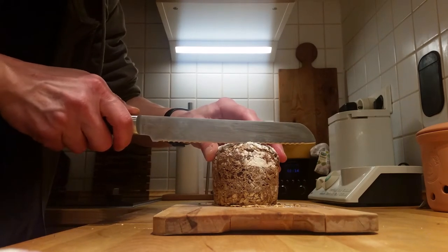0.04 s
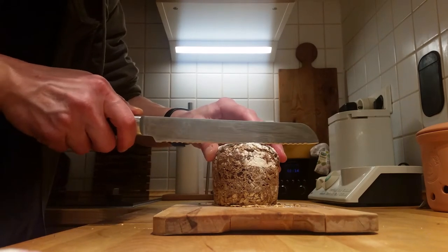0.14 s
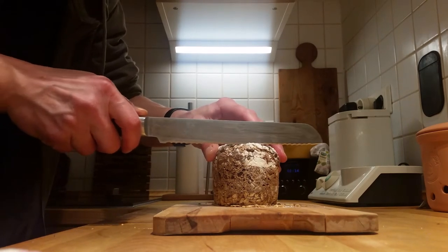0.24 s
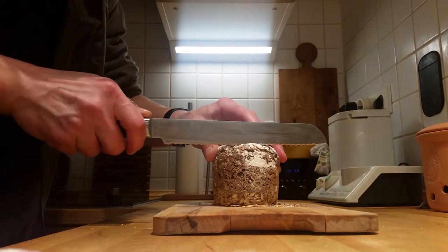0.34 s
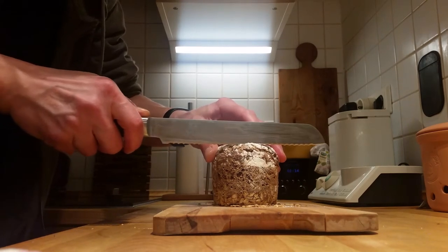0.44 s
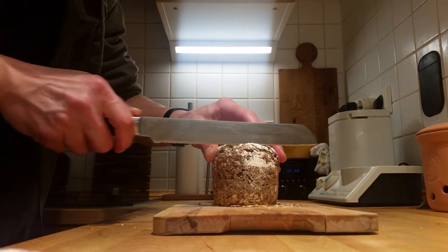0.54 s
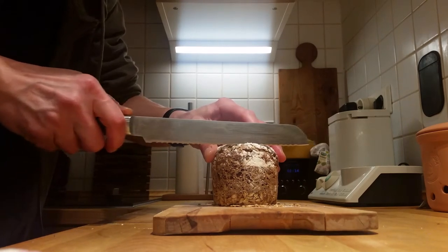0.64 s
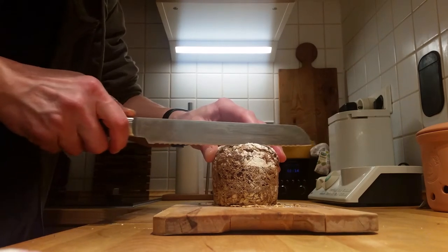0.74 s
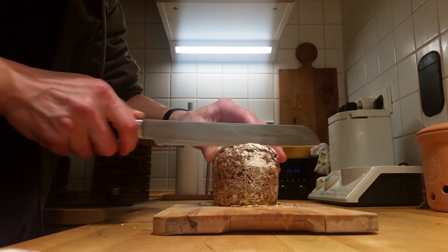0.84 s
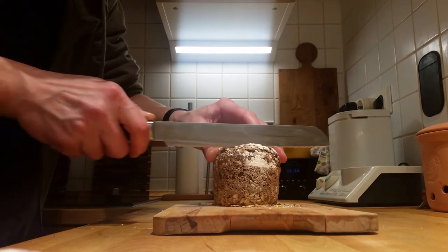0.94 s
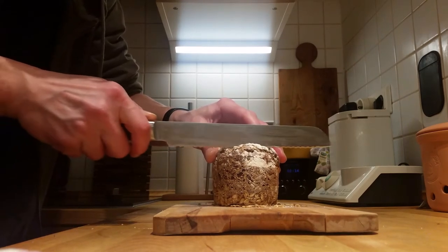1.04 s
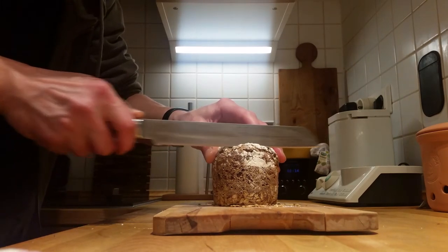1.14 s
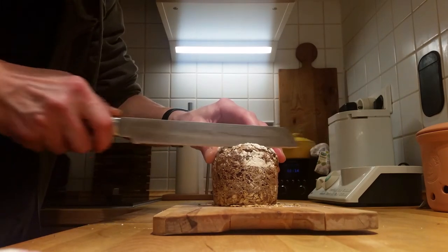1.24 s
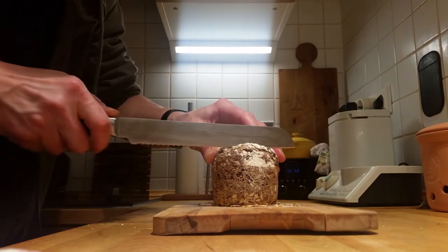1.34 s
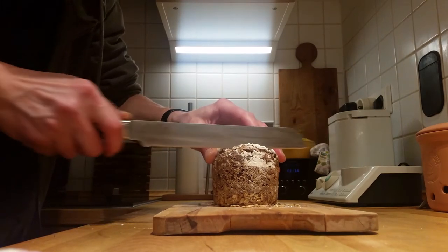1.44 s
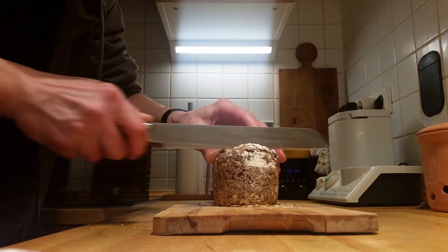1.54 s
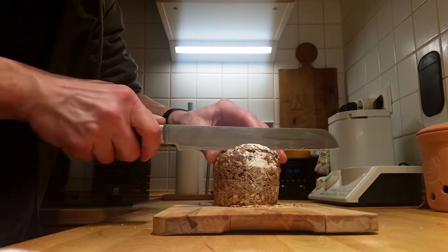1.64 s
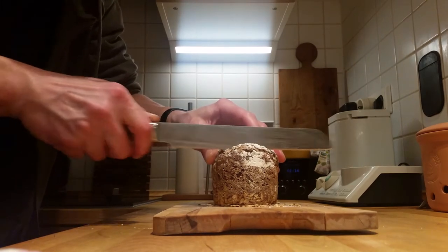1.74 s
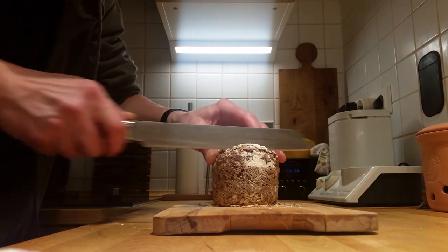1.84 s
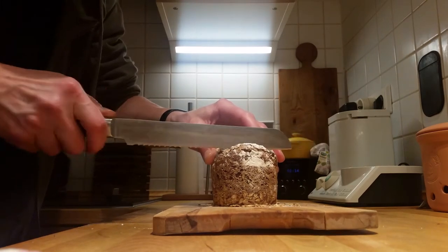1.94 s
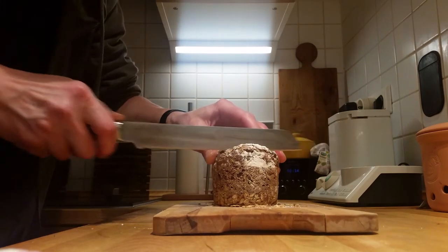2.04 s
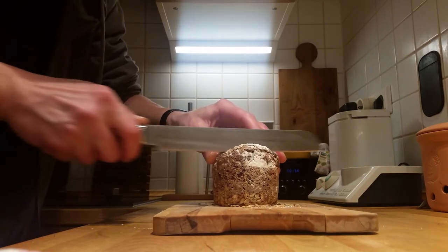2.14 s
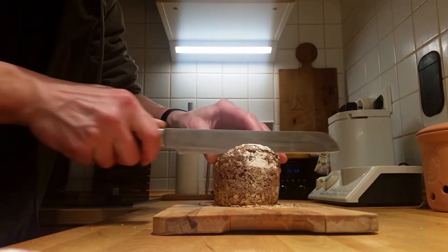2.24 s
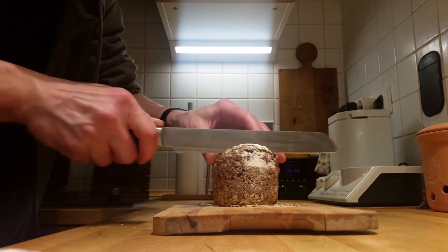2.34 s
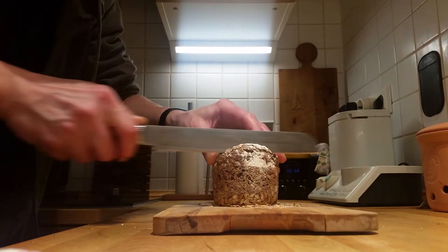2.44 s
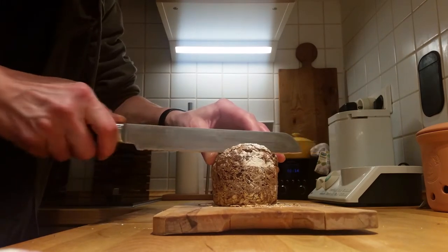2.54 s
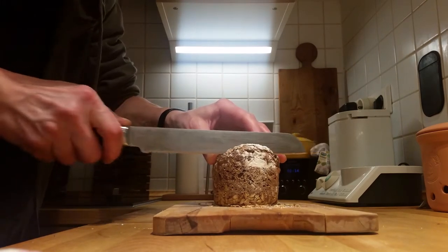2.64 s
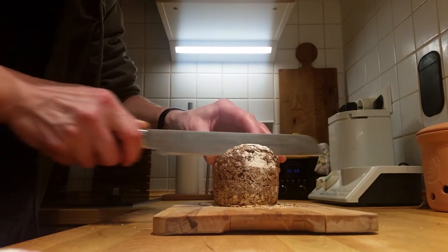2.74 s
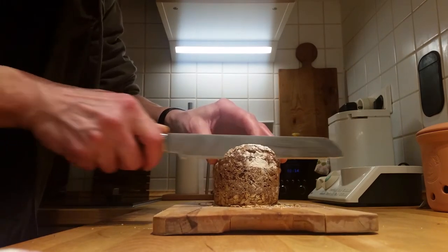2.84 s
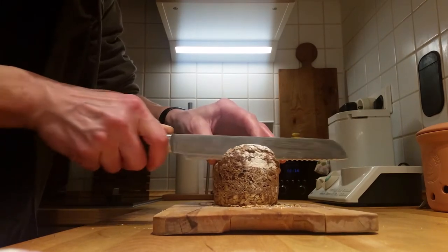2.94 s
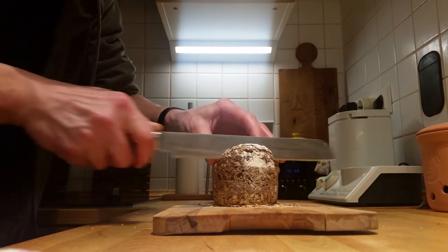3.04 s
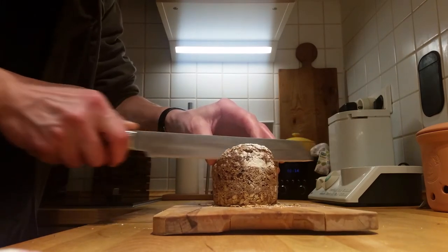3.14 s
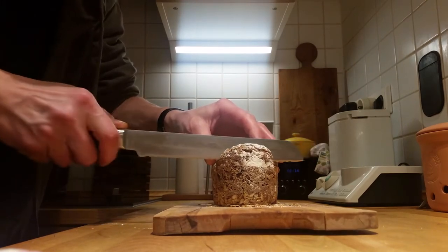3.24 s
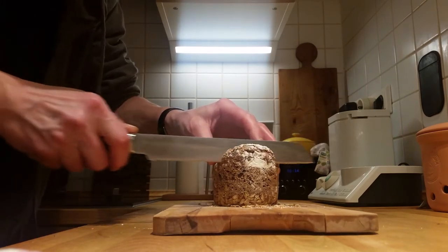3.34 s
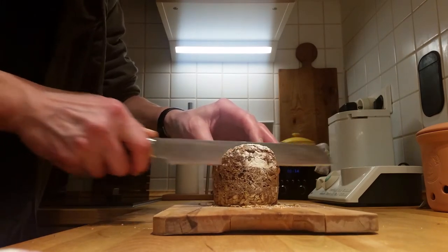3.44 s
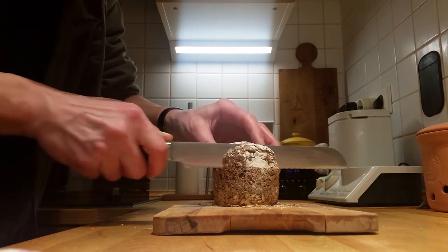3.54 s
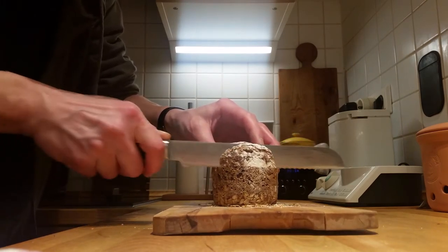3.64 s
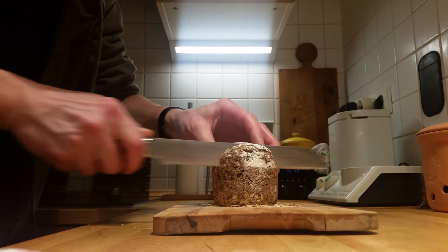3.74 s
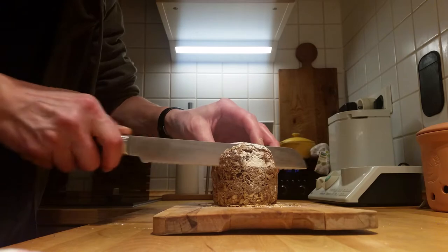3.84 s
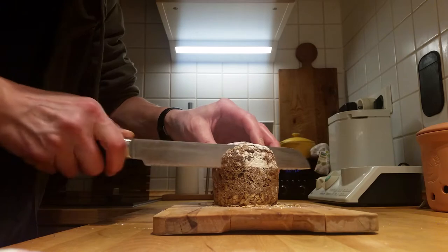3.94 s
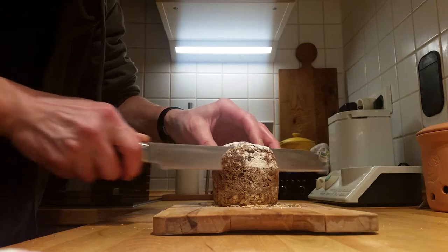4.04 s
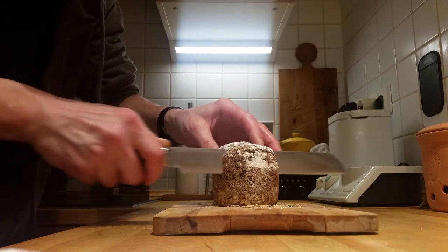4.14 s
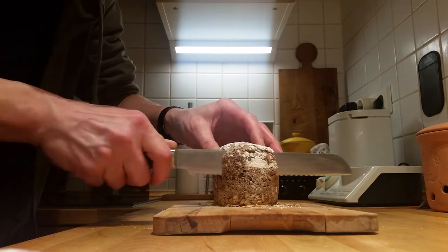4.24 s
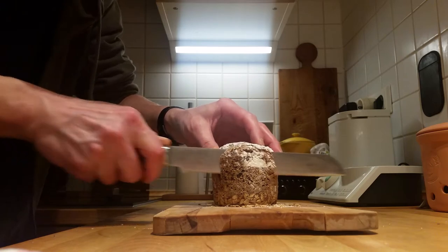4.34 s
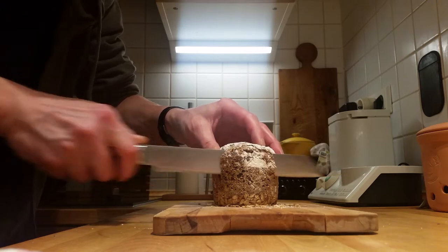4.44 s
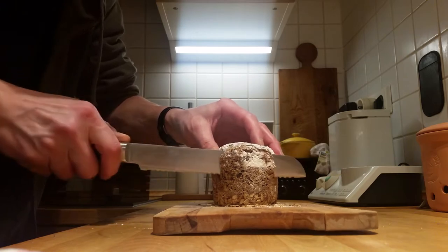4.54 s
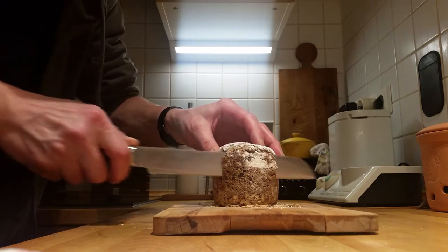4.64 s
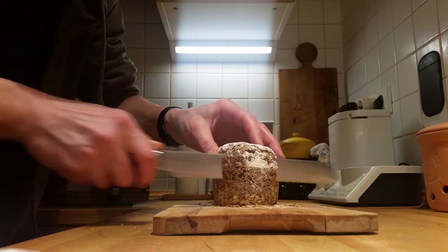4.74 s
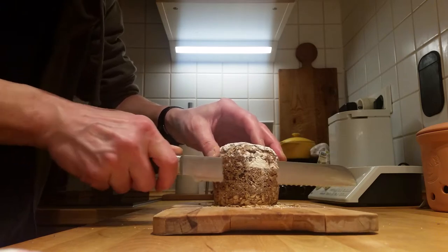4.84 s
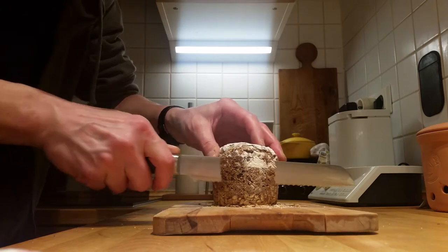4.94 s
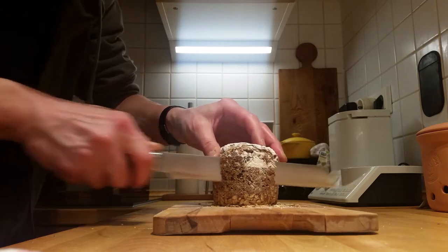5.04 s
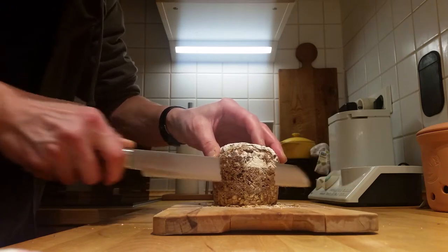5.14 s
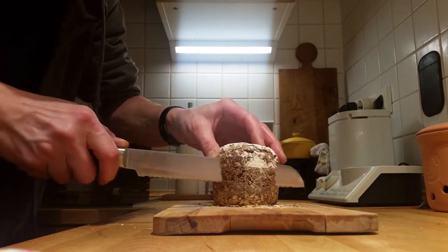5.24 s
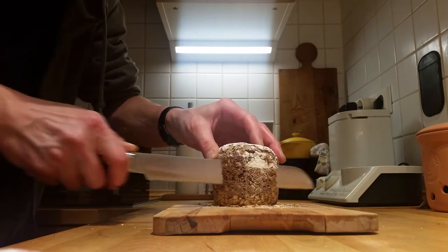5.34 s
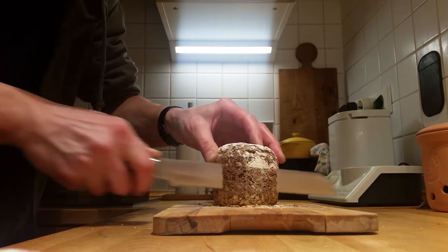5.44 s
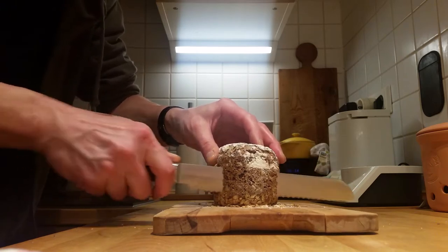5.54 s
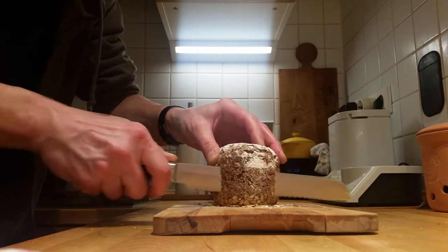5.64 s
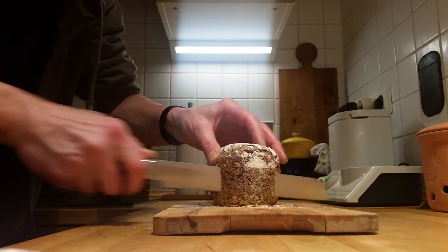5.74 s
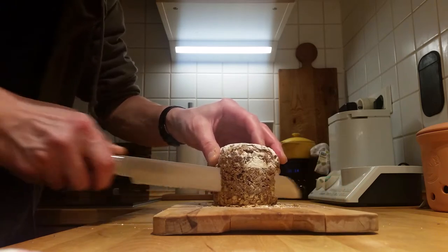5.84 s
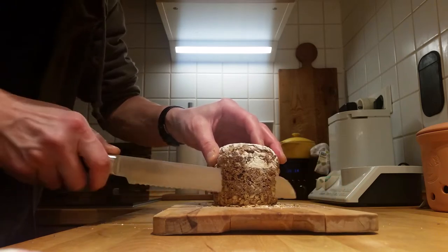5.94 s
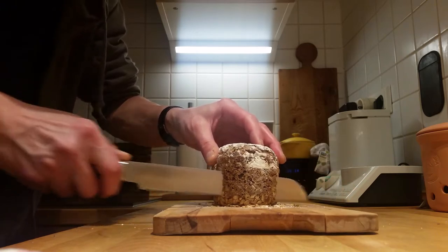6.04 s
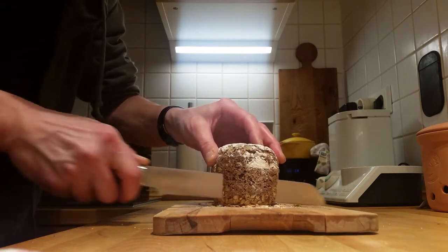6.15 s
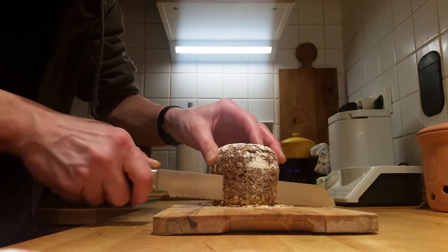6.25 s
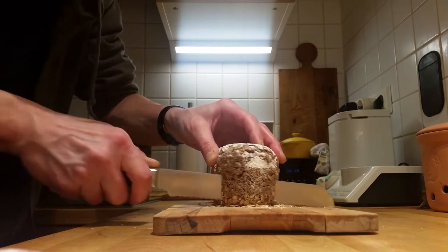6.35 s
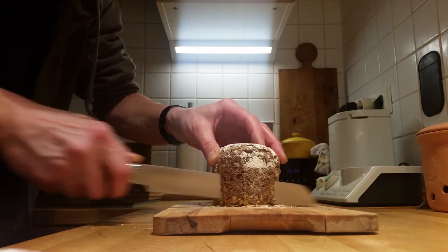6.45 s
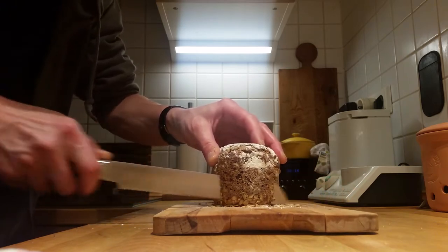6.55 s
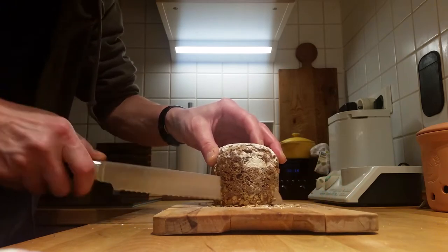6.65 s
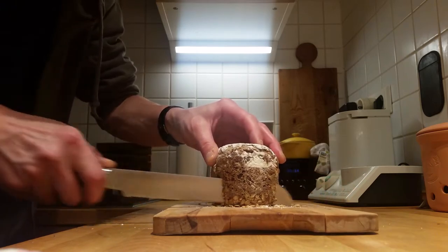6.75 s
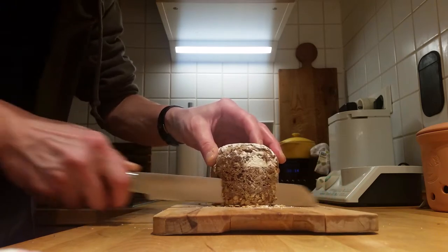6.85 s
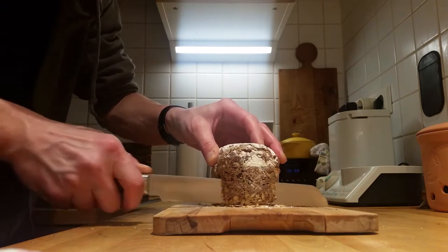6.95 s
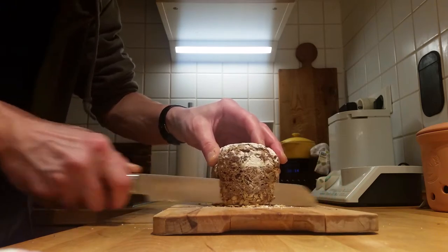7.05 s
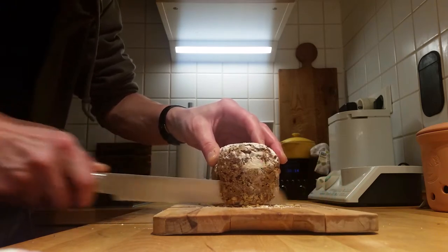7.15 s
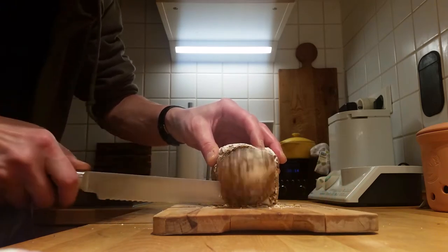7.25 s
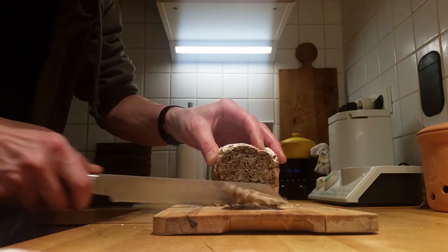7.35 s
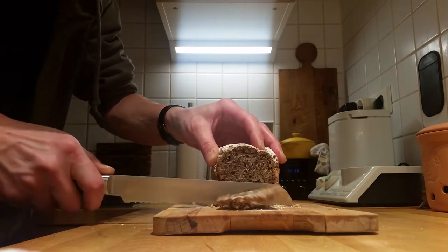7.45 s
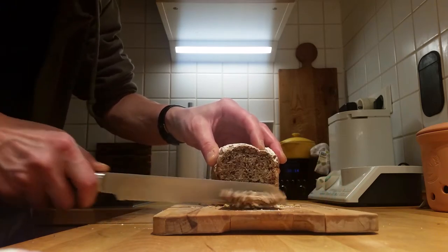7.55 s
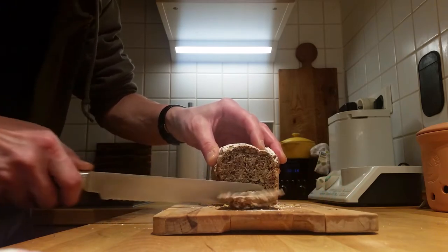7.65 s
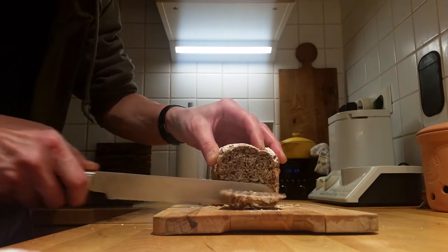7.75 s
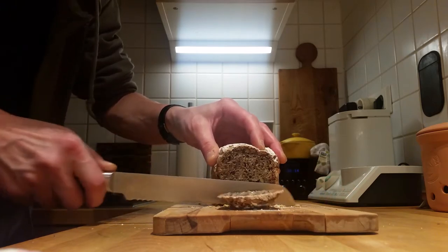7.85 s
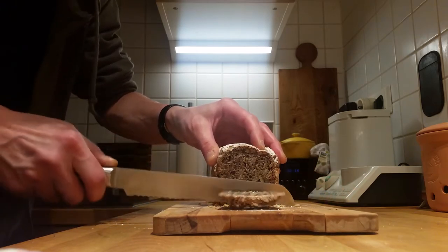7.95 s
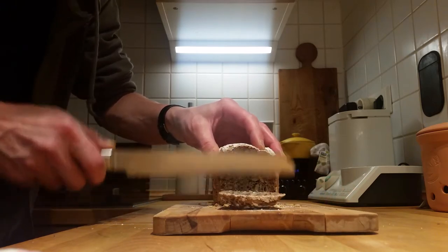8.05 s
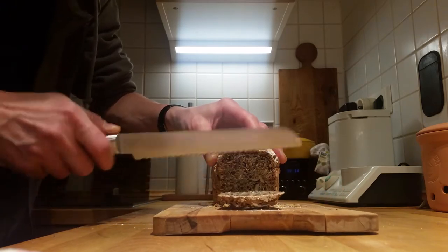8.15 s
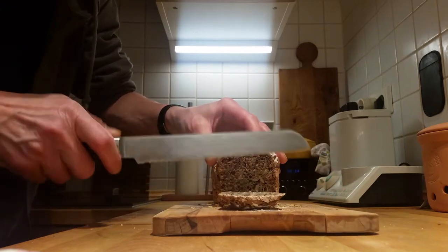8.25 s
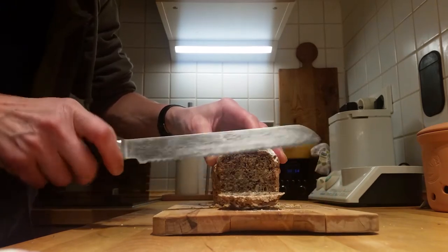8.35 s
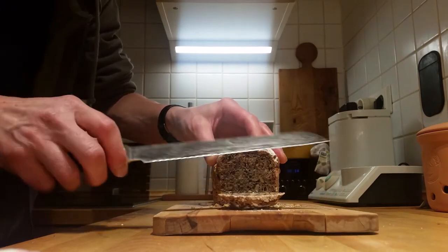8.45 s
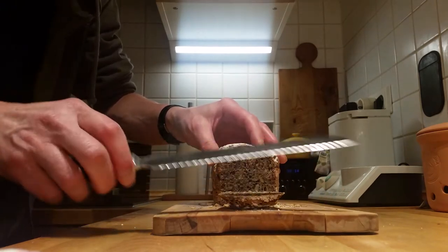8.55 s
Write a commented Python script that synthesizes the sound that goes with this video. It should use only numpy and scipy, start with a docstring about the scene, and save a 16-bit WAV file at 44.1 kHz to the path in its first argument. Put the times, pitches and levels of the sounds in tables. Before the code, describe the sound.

In a quiet tiled kitchen, a phone on the worktop picks up low room tone and faint hiss. From about 0.4 seconds a toothed knife makes light, muffled strokes on a dense loaf, with small board bumps. By 1.2 seconds the sawing is stronger: roughly three strokes per second, each swelling into a deep worktop hum and grainy crumb rasp. From 1.8 to 5.6 seconds crisp little crust cracks and dull wooden knocks scatter irregularly among the strokes. Around 6 seconds the cutting is somewhat smoother, with fewer cracks. From 6.8 the teeth scrape bare wood, brighter and harsher, strongest near 7.25. At 7.4 the slice lands with a loud, nearly merged double knock. Two shorter scrapes follow until about 7.9, then the knife lifts and is turned almost silently around 8.5. Echoes are short; the low hum leans left, the treble right.

```python
"""A knife with a toothed edge is set on a dense loaf on a wooden board and saws through it, stroke by stroke.
Each stroke shakes the worktop and board by filtered noise and a low hum; the crust cracks and the board knocks
in short filtered bursts. Near the end the teeth scrape bare wood, the slice drops with a double knock, and
the knife is lifted off and turned in the hand. All along, a phone on the worktop hears this with two
microphone ports, with the echo of a tiled kitchen, quiet room tone and faint microphone hiss."""
import sys
import numpy as np
from scipy import signal
from scipy.fft import rfft, irfft, next_fast_len
from scipy.io import wavfile
from scipy.ndimage import uniform_filter1d

SR = 44100
rng = np.random.default_rng(int(sys.argv[2]) if len(sys.argv) > 2 else 0)


def unload_wav(signal):
    """Save mono or channel-first audio to the path in sys.argv[1] as 16-bit WAV at rate SR, clipped to [-1, 1]."""
    wavfile.write(
        sys.argv[1],
        SR,
        np.round(np.clip(np.atleast_2d(signal).T, -1, 1) * 32767).astype(np.int16),
    )


N = 378991  # length in samples

# Knife strokes, from setting the knife on the loaf to lifting it off.
# Each row: fastest moment in seconds, rise time in seconds, fall time in seconds, then the peak levels in dB
# that drive worktop sway, worktop thrum, board, rasp of the teeth and crumb hiss.
STROKES = [(0.371, 0.28, 0.1, -65, -58, -68.5, -82, -95), (0.601, 0.11, 0.21, -56, -47, -59, -64, -71.5),
           (0.938, 0.14, 0.19, -51, -41, -59.5, -66, -76.5),
           (1.232, 0.078, 0.14, -40, -35.5, -59.5, -65, -66.5),
           (1.623, 0.32, 0.13, -46, -35, -50, -57, -67.5), (1.908, 0.12, 0.13, -28.5, -33, -52.5, -56, -64),
           (2.216, 0.16, 0.13, -37, -26.5, -42, -51, -61),
           (2.542, 0.15, 0.098, -33.5, -35, -52.5, -52, -63.5),
           (2.847, 0.24, 0.15, -41.5, -29.5, -46, -54, -63.5), (3.16, 0.083, 0.17, -32, -34, -47, -54, -63),
           (3.537, 0.19, 0.135, -45, -30.5, -47, -53, -65),
           (3.827, 0.12, 0.15, -36.5, -32.5, -46, -54, -64.5),
           (4.158, 0.2, 0.15, -40.5, -28.5, -41.5, -54.5, -69),
           (4.516, 0.18, 0.12, -43.5, -41, -54.5, -59, -71.5),
           (4.85, 0.18, 0.13, -33.5, -29, -41, -48.5, -60.5),
           (5.124, 0.11, 0.19, -36, -32, -41, -54, -62.5), (5.553, 0.2, 0.096, -43, -30, -38.5, -48, -61),
           (5.895, 0.21, 0.1, -51, -37, -48, -61, -74.5), (6.23, 0.3, 0.14, -59, -35, -47.5, -56.5, -76),
           (6.562, 0.15, 0.13, -60, -34.5, -46.5, -53, -72.5), (6.76, 0.062, 0.19, -52, -38, -51, -65, -88),
           (6.94, 0.11, 0.074, -54, -35, -38.5, -38, -59.5),
           (7.252, 0.15, 0.066, -64, -32.5, -34, -36, -56),
           (7.43, 0.094, 0.11, -47.5, -31.5, -36, -37.5, -60.5),
           (7.686, 0.13, 0.096, -62, -37, -41.5, -44.5, -74),
           (7.843, 0.052, 0.13, -65, -40, -42.5, -42, -65.5),
           (8.11, 0.35, 0.35, -77, -67.5, -69.5, -76, -97)]
# The knife is turned in the hand over the board. Each row: the same columns and units as the strokes.
HANDLING = [(8.52, 0.037, 0.06, -93, -72, -74, -71, -102)]
# Board rocking; the last two rows are the slice landing on its edge, then flat.
# Each row: start in seconds, base level in dB, share of the feet in dB, share of the bright rattle in dB.
KNOCKS = [(0.559, -47.5, 4.5, -21), (0.637, -47, -12, -3), (0.821, -46, 8.5, -21), (1.349, -39.5, 20.5, 3),
          (1.449, -42, 9, -6), (1.598, -45.5, -2, -16), (1.996, -37.5, 17, -4), (2.102, -35.5, 1.5, -6.5),
          (2.55, -48, -13, 12), (2.624, -38.5, 18.5, 0.5), (2.699, -30.5, -1, -14), (3.149, -48, -2, -6),
          (3.284, -51, 24.5, -14), (3.362, -39.5, 7, -24), (3.738, -40, 17.5, -4), (3.932, -38.5, 15, -7),
          (4.014, -33.5, -10, -10), (4.669, -35, -1, -12), (4.727, -48, -3, 2), (5.311, -47.5, -3, -15),
          (5.414, -38, -17.5, -4), (6.014, -39, -3, -14), (6.724, -40.5, -5, -19),
          (7.386, -15.5, -12, -2.5), (7.3888, -20.5, -7, -3)]
# Crust cracks and bites of the teeth.
# Each row: start in seconds, base treble level in dB, share into loaf and board in dB.
CRACKS = [(0.491, -48, 10), (1.1249, -37.5, 6.5), (1.7596, -35, 7), (2.403, -32.5, 6.5), (2.8527, -31, 0),
          (3.037, -32, 3.5), (3.077, -40, -2), (3.488, -37, 3), (3.6918, -31, 5), (4.084, -40, 9),
          (4.0995, -32.5, 5), (4.134, -35.5, -15), (4.2043, -35.5, -10), (4.2338, -35, -5),
          (4.287, -54, -16), (4.35, -36, 7.5), (4.6856, -58, 19), (4.7508, -48, 9), (4.7642, -33, 6.5),
          (4.8796, -33, -10), (4.91, -40.5, -4), (5.018, -37.5, 7.5), (5.0609, -39, -5), (5.222, -41, 13),
          (5.39, -49, 0), (5.5191, -34.5, 5), (5.5744, -35, 0), (5.9304, -34.5, 8), (6.63, -35, 7),
          (6.786, -62.5, 27), (7.385, -47.5, 12.5), (7.427, -38.5, 5), (8.0942, -57.5, 14)]
# Resonances of each thing that sounds.
# Each row: pitch in Hz, width in Hz (before any extra damping), relative level in dB.
WORKTOP_TONES = [(88.6, 25.4, -0.5), (110.4, 22.7, 2.5), (150, 22.7, -1), (197, 11, -14),
                 (194, 35.7, -14.5)]
BOARD_LOW_TONES = [(304.4, 17.6, 1), (363, 20.9, 2.5), (439.5, 60.3, -0.5), (620, 89, -13.5)]
BOARD_HIGH_TONES = [(740, 45, -3), (890, 45, -7), (1025, 40, 0), (1255, 70, -8), (1520, 60, -8),
                    (2100, 70, -13), (2360, 140, -8), (2870, 150, -24)]
BLADE_TONES = [(3670, 500, 2.5), (6250, 360, -2), (7500, 500, -14.5), (8900, 250, 1), (10200, 250, 7),
               (11700, 250, -4), (13600, 600, 3.5), (15150, 350, 4)]
FEET_TONES = [(166, 37, 3.5), (220.5, 36, -3), (297, 44, 0)]  # the board rocking on its feet
LOAF_TONES = [(695, 580, -5.5), (945, 202, 3), (1450, 590, -7), (2057, 380, -5), (3000, 450, -16.5)]
CRUST_TONES = [(4100, 890, 2), (6300, 300, -10.5), (8660, 590, -6), (10030, 400, 2), (11300, 1600, -0.5),
               (12600, 2200, 0), (15200, 1600, 3.5)]
# How the two microphone ports differ. Each row: pitch in Hz, left minus right in dB.
PORT_BALANCE = [(50, 6.5), (110, 10), (200, 3), (380, 0), (800, -2.5), (1300, -2), (2400, -11), (4400, -34),
                (6000, -21), (9000, -20), (15000, -9)]
# The hiss swells while the knife works. Each row: time in seconds, level in dB before the top is cut.
HISS_LEVEL = [(0, -73), (.42, -70), (.6, -65.5), (1.63, -60.5), (3.28, -60.5), (4.09, -59.5), (4.47, -62),
              (4.9, -60.5), (5.45, -60.5), (5.67, -63.5), (6.2, -61.5), (6.45, -65), (7.37, -59.5),
              (7.8, -59), (8.04, -64.5), (8.25, -72.5)]
# Tone color of the hiss in each port. Each row: pitch in Hz, relative level in dB per Hz.
HISS_LEFT = [(1500, -6), (3000, -20.5), (3500, -1), (4200, 4), (4800, -1), (5300, -33.5), (8000, -34),
             (12000, -25), (16000, -16)]
HISS_RIGHT = [(1500, -11.5), (3000, -54), (4200, -6), (5300, -38), (8000, -46.5), (16000, -65)]
# Tone color of the quiet room. Each row: pitch in Hz, relative level in dB per Hz.
KITCHEN_TONE = [(18, -45), (30, -23), (107, -4.5), (140, 2.5), (270, -10.5), (420, -9.5), (618, -20.5),
                (694, -17), (809, -18.5), (3000, -91), (3900, -76), (6600, -120)]

KITCHEN_DB = -67.5
SWAY_HZ = 52  # center of the wandering hum
BARE_WOOD_S, WOOD_FADE_S = 6.78, 0.061  # when the teeth reach the board, and how long the change takes
FADE_DB, ARCH = 16.5, 1.78  # drop one rise or fall time from the peak; roundness of the arch
SWAY_FADE_DB, SWAY_LATE_S = 18.5, 0.045  # the heavy worktop answers late
# Crumbs keep breaking after a crack: decay time, and levels relative to the crack.
CRUMBLE_S, CRUMBLE_TREBLE_DB, CRUMBLE_LOAF_DB = 0.041, -24.5, -20
LOAF_DAMP = 2.22  # times wider low board resonances while the blade sits in the crumb
PORT_LAG_S = 0.00016  # left hears later
ROOM_T60_S, ROOM_DB = 0.22, -9  # time for the noise tail to drop 60 dB; echo level before its bass is thinned
TOP_HZ = 15650  # nearly nothing is left above this


def sawing():
    """Teeth tearing crumb drive worktop, board, loaf and crust; later they scrape bare wood."""
    t = np.arange(N) / SR
    thrum, board, rasp, hiss = (stroke_level(column=k, fade_db=FADE_DB) for k in range(1, 5))
    crumbs = crumble()
    rasp = np.hypot(rasp, undb(CRUMBLE_LOAF_DB) * crumbs)
    hiss = np.hypot(hiss, undb(CRUMBLE_TREBLE_DB) * crumbs)
    wood = np.clip((t - BARE_WOOD_S) / WOOD_FADE_S, 0, 1)
    worktop = worktop_sway() + worktop_thrum(thrum)
    return worktop + tear_crumb(board, rasp, hiss, wood) + scrape_wood(board, rasp, hiss, wood)


def worktop_sway():
    """The heavy worktop hums with a wandering low pitch, a little late, stronger on the left."""
    phase = 2 * np.pi * np.cumsum(SWAY_HZ + 3 * walk(9)) / SR
    level = stroke_level(column=0, fade_db=SWAY_FADE_DB, late_s=SWAY_LATE_S)
    return undb([[2.5], [-2.5]]) * np.sqrt(2) * level * np.sin(phase)


def worktop_thrum(level):
    """Uneven grit from the strokes sets off the worktop's low resonances."""
    push = level * undb(4.25 * walk(22)) * grit(1500, 2.0, 0.48)
    return ring(push, modes(WORKTOP_TONES, dull_hz=390))


def tear_crumb(board, rasp, hiss, wood):
    """Tiny breaks in the crumb ring the damped board, the loaf and the crust."""
    catching = undb(2.93 * walk(60) + 2.56 * walk(18))  # the teeth catch in clusters
    crumb = (1 - wood + undb(-8.5) * wood) * catching  # some crumb still drags on the wood
    out = ring(board * crumb * grit(900, 2.15, 0.87), modes(BOARD_LOW_TONES, LOAF_DAMP, 1500))
    out = out + ring(rasp * crumb * grit(2000, 2.0, 0.45), modes(LOAF_TONES))
    return out + ring(hiss * crumb * grit(5000, 0.69, 0.26), modes(CRUST_TONES))


def scrape_wood(board, rasp, hiss, wood):
    """On bare wood a finer grain makes the board and blade ring without the loaf's damping."""
    scrape = wood * grit(8000, 0.79, 0.6)
    out = ring(board * scrape, modes(BOARD_LOW_TONES, dull_hz=3000))
    out = out + ring(rasp * scrape, modes(BOARD_HIGH_TONES, dull_hz=9000))
    return out + ring(hiss * scrape, modes(BLADE_TONES, dull_hz=15000))


def stroke_level(column, fade_db, late_s=0):
    """Level of one layer over time: every stroke swells to its peak and fades, and powers add."""
    t = np.arange(0, N + 64, 64) / SR  # coarse steps, joined by straight lines below
    power = 0
    for peak_s, rise_s, fall_s, *db in STROKES + HANDLING:
        top_s = peak_s + late_s
        away = np.where(t < top_s, (top_s - t) / rise_s, (t - top_s) / fall_s)
        power = power + undb(db[column] - fade_db * away ** ARCH) ** 2
    return np.interp(np.arange(N) / SR, t, np.sqrt(power))


def crumble():
    """Crumbs break on after each crack: the level jumps up and dies away."""
    start_s, db, _ = np.transpose(CRACKS)
    jumps = np.zeros(N)
    jumps[(start_s * SR).astype(int)] = undb(db)
    return signal.lfilter([1], [1, -np.exp(-1 / (CRUMBLE_S * SR))], jumps)


def cracks():
    """Short splintering bursts ring the crust and, duller, the loaf and board."""
    start_s, db, low_db = np.transpose(CRACKS)
    bright = ring(blows(start_s, undb(db + 8), 0.00029, 0.0028, 0.25), peak_one(modes(CRUST_TONES)))
    board = peak_one(modes(BOARD_LOW_TONES, LOAF_DAMP))
    dull = peak_one(modes(LOAF_TONES)) + undb(-5) * board
    return bright + ring(blows(start_s, undb(db + low_db - 5), 0.001, 0.0088, 0.78), dull)


def knocks():
    """Soft blows ring the board, its feet thump the worktop, and a short rattle joins in."""
    start_s, db, feet_db, bright_db = np.transpose(KNOCKS)
    board = peak_one(modes(BOARD_LOW_TONES[2:], 0.68, 840, struck=True))
    out = -ring(blows(start_s, undb(db - 8.0), 0.00079, 0.00036, 0), board)
    thump = blows(start_s, undb(db + feet_db - 12.5), 0.0006, 0.00065, 0)  # clean and short
    thump = thump + blows(start_s, undb(db + feet_db + 1), 0.0064, 0.015, 1)  # rough and longer
    out = out - ring(thump, peak_one(modes(FEET_TONES, dull_hz=900, struck=True)))
    rattle = blows(start_s, undb(db + bright_db + 0.5), 0.00019, 0.0036, 0.55)
    return out + ring(rattle, peak_one(modes(BOARD_HIGH_TONES, 1.6, 5700)))


def tiles(near):
    """Tiled walls return a fading blur of echoes, different at each port, with little bass."""
    t = np.arange(int(0.5 * SR)) / SR
    fade = undb(-60 * t / ROOM_T60_S) * np.clip(t / 0.0015, 0, 1)
    tail = rng.standard_normal((2, len(t))) * fade
    tail = tail / np.sqrt(np.sum(tail ** 2, axis=1, keepdims=True))
    less_bass = bins() / (bins() + 600)
    return undb(ROOM_DB) * ring(near, rfft(tail, next_fast_len(N)) * less_bass)


def kitchen():
    """Quiet room tone: steady, mostly low noise, partly shared by the two ports."""
    noise = rng.standard_normal((3, N))
    tone = ring(0.51 * noise[0] + 0.95 * noise[1:], undb(shape(KITCHEN_TONE)))
    return tone / tone.mean(axis=0).std() * undb(KITCHEN_DB)


def grit(rate, spread_db, alike):
    """Tiny breaks of very unequal size (rate per second), partly the same at both ports; unit power."""
    happens = rng.random((3, N)) < rate / SR
    size = undb(spread_db * rng.exponential(size=(3, N))) * rng.standard_normal((3, N))
    breaks = happens * size
    pair = np.sqrt(alike) * breaks[0] + np.sqrt(1 - alike) * breaks[1:]
    return pair / pair.std()


def blows(times, gains, rise_s, length_s, rough):
    """A push rises and dies away at each time, clean (rough 0) or splintered (rough 1); unit energy times gain."""
    x, t = np.zeros(N), np.arange(int(0.08 * SR)) / SR
    envelope = (1 - np.exp(-t / rise_s)) * np.exp(-t / length_s)
    for start_s, gain in zip(times, gains):
        push = envelope * (1 - rough + rough * rng.standard_normal(len(t)))
        i = int(start_s * SR)
        x[i:i + len(t)] += gain * push / np.sqrt(np.sum(push ** 2))
    return x


def modes(table, damp=1, dull_hz=30000, struck=False):
    """Resonances as the two ports hear them, at unit power; neighbouring ones alternate in sign, unless struck,
    when a blow starts them all in step."""
    f = bins()
    body = 0
    for k, (hz, width_hz, db) in enumerate(table):
        sign = 1 if struck else (-1) ** k
        sharpness = hz / (damp * width_hz)
        body = body + sign * undb(db) / (1 + 1j * (f / hz - hz / f) * sharpness)
    body = body / (1 + 1j * f / dull_hz) ** 2  # softer treble
    left = body * undb(shape(PORT_BALANCE)) * np.exp(-2j * np.pi * PORT_LAG_S * f)
    pair = np.array([left, body])
    return pair / np.sqrt(np.mean(abs(pair.mean(axis=0)) ** 2))


def peak_one(response):
    """Scale a response so that a single click peaks at 1 in the average of the ports."""
    return response / abs(irfft(response.mean(axis=0))).max()


def ring(x, response):
    """Let a sound set off a resonance by filtering it."""
    return irfft(rfft(x, next_fast_len(N)) * response, next_fast_len(N))[..., :N]


def walk(rate):
    """Random levels, a new one rate times a second, smoothed twice."""
    k = int(SR / rate)
    steps = np.repeat(rng.standard_normal(N // k + 1), k)
    return uniform_filter1d(uniform_filter1d(steps, k), k)[:N]


def shape(table):
    """Curve in dB through (Hz, dB) points, straight on a musical pitch scale."""
    hz, db = np.transpose(table)
    return np.interp(np.log(bins()), np.log(hz), db)


def bins():
    """Frequencies in Hz at which filters are drawn; the lowest is raised to 1."""
    return np.maximum(np.fft.rfftfreq(next_fast_len(N), 1 / SR), 1)


def undb(db):
    """Turn a level in dB into a plain multiplier."""
    return 10 ** (np.asarray(db) / 20)


def scene():
    """Strokes, knocks and cracks, with their echo and the room tone of the kitchen."""
    near = sawing() + knocks() + cracks()
    return near + tiles(near) + kitchen()


def record(dry):
    """The microphones add hiss, colored differently in each port, and a steep filter cuts the top."""
    time_s, db = np.transpose(HISS_LEVEL)
    color = undb([shape(HISS_LEFT), shape(HISS_RIGHT)])
    hiss = ring(rng.standard_normal((2, N)), color)
    hiss = hiss / hiss.mean(axis=0).std() * undb(np.interp(np.arange(N) / SR, time_s, db))
    top_cut = signal.ellip(10, 0.2, 70, TOP_HZ, fs=SR, output="sos")
    return signal.sosfilt(top_cut, dry + hiss)


dry = scene()
out = record(dry)
unload_wav(out)
```